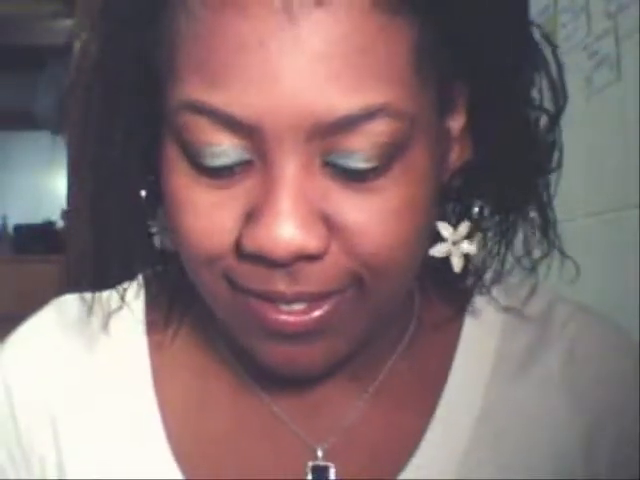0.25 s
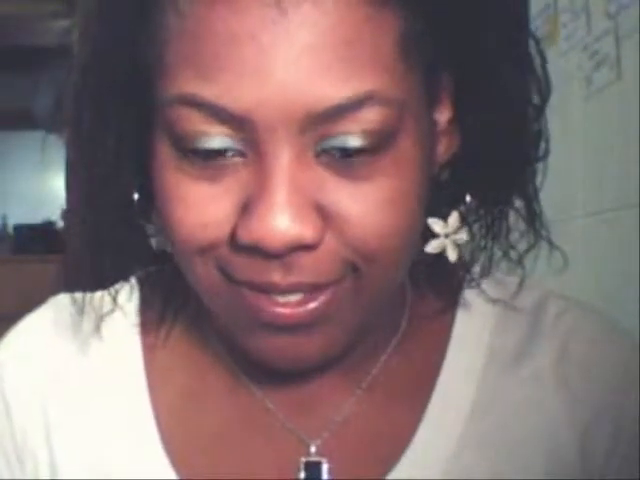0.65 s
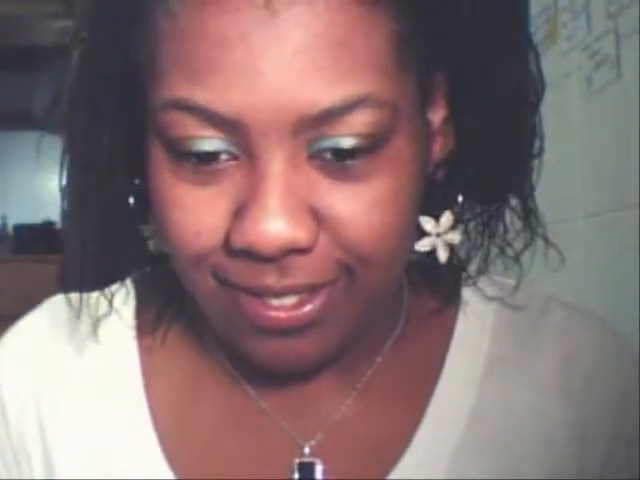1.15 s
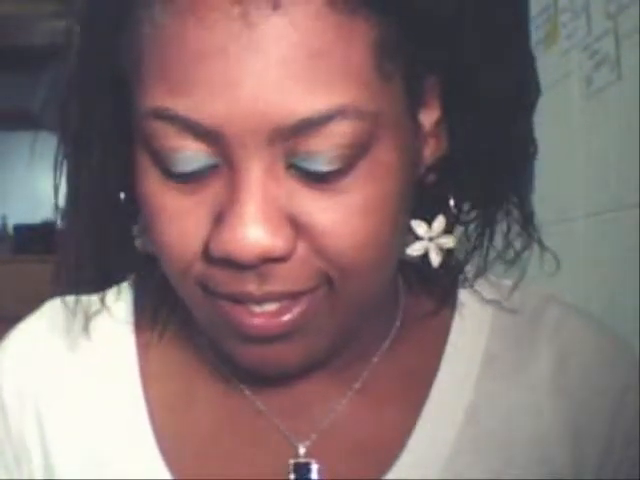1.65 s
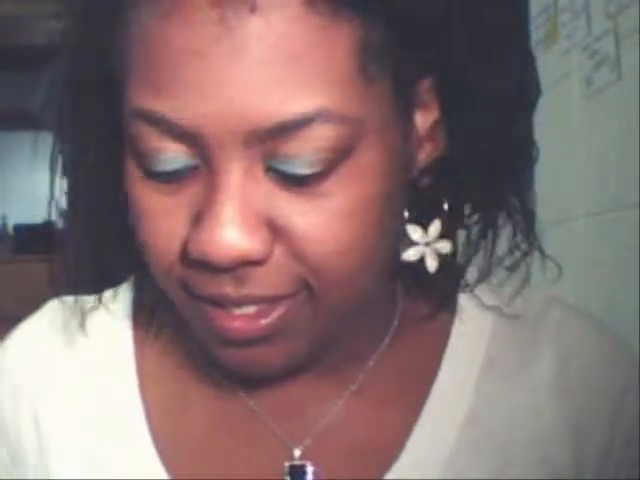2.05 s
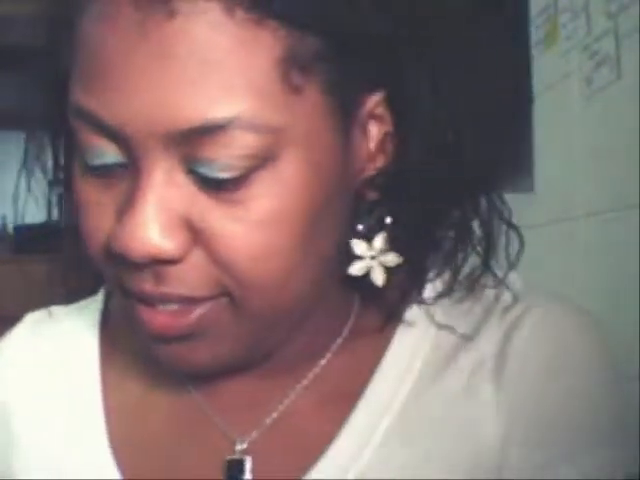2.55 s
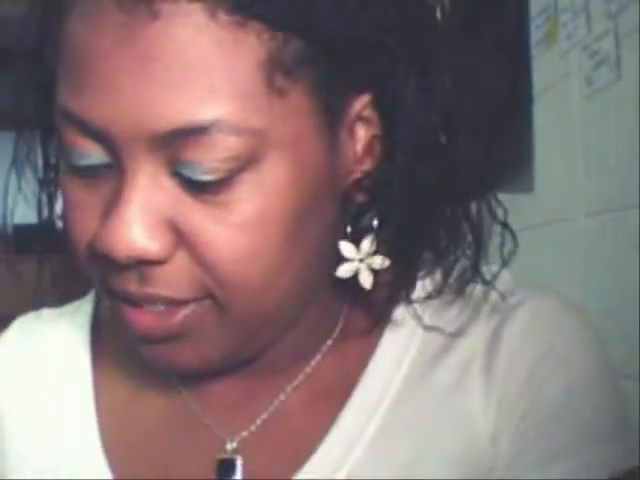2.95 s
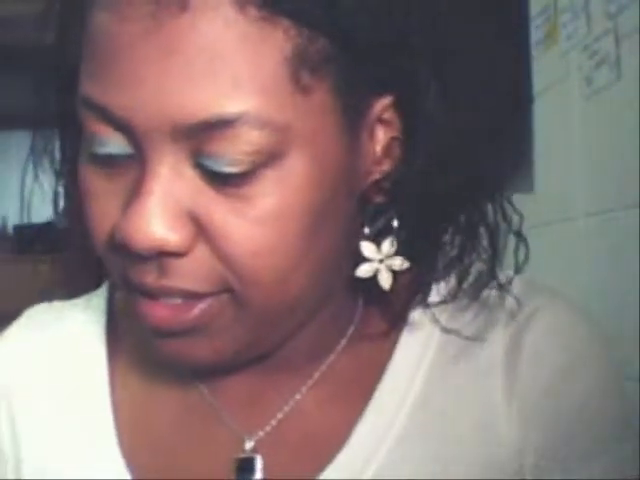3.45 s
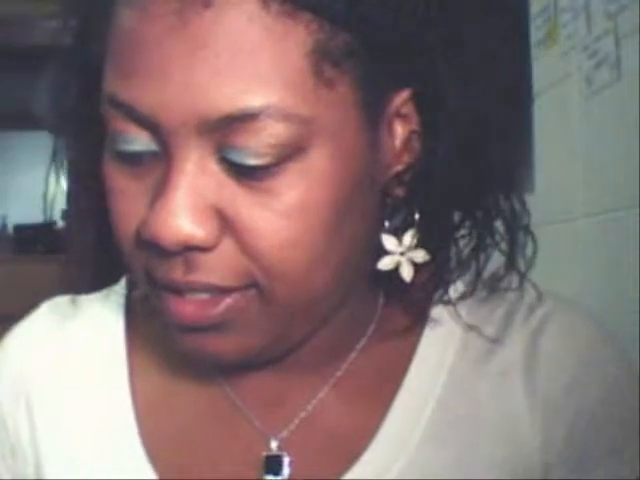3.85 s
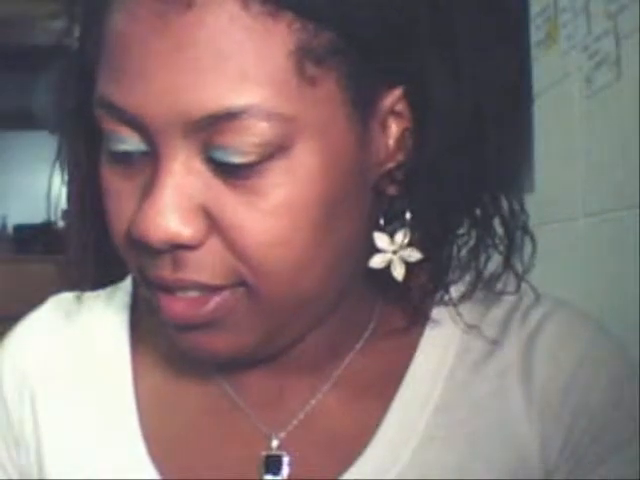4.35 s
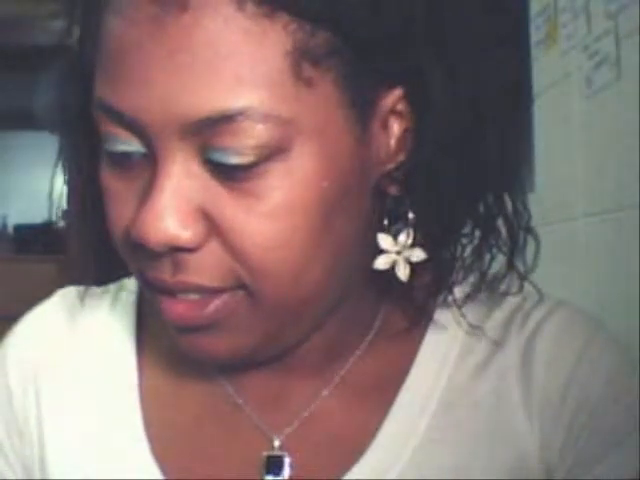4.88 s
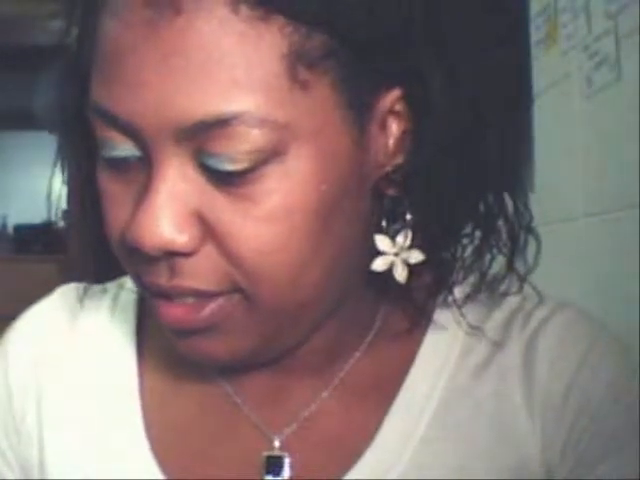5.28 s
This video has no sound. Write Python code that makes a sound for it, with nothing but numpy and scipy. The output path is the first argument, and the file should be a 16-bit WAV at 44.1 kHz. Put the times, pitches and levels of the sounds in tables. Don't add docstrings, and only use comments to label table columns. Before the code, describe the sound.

Handling of small hard plastic cases at a desk: one early click, a few faint ticks, a sharp knock with a low woody thump, a cluster of rubbing and tapping, then the loudest snap as a lid closes. Two isolated ticks come after. The band-limited microphone adds steady crackly hiss and stray electrical pops over a soft low fan hum.

```python
import sys
import numpy as np
from scipy import signal
from scipy.fft import rfft, irfft, next_fast_len
from scipy.io import wavfile

SR = 44100
rng = np.random.default_rng(int(sys.argv[2]) if len(sys.argv) > 2 else 0)


def level_to_linear(level):
    exponent = np.asarray(level, float) / 20
    return 10 ** exponent


def materialize(psi):
    bounded = np.clip(np.atleast_2d(psi).T, -1, 1)
    quanta = np.round(bounded * 32767).astype(np.int16)
    wavfile.write(sys.argv[1], SR, quanta)


N = 243476


def set_level(x, rms_db):
    return x * level_to_linear(rms_db) / np.sqrt(np.mean(x ** 2))


def resonate(x, modes):
    out = 0
    for k, (mode_hz, width_hz, gain_db) in enumerate(modes):
        b, a = signal.iirpeak(mode_hz, mode_hz / max(width_hz, 2), fs=SR)
        out = out + (-1) ** k * level_to_linear(gain_db) * signal.lfilter(b, a, x)
    return out


def add(track, start_s, sound, peak_db):
    i = int(start_s * SR)
    part = sound[:N - i]
    track[i:i + len(part)] += part * level_to_linear(peak_db) / np.max(np.abs(sound))


# pitch_hz [Hz], density_db [dB per Hz]
FAN_SPECTRUM = [(20, -41.5), (55, -2), (125, -6.5), (160, -14.5), (300, -19), (1110, -14), (1460, -21.5),
                (2860, -44)]
# pitch_hz [Hz], width_hz [Hz], level_db [dB rms]
FAN_HUMS = [(74.93, 4.7, -58), (115.8, 14, -60), (683, 10, -67), (1010, 10, -87)]


def fan():
    size = next_fast_len(N)
    hz = np.maximum(np.arange(size // 2 + 1) * SR / size, 1)
    point_hz, point_db = np.array(FAN_SPECTRUM).T
    colour = level_to_linear(np.interp(np.log(hz), np.log(point_hz), point_db, left=-80, right=-80))
    air = irfft(rfft(rng.standard_normal(size)) * colour, size)[:N]
    out = set_level(air, -51)
    for pitch_hz, width_hz, level_db in FAN_HUMS:
        mode = [(pitch_hz, width_hz, 0)]
        hum = resonate(resonate(rng.standard_normal(N), mode), mode)
        out = out + set_level(hum, level_db)
    return out


# start_s [s], level_db [dB peak]
SPIKES_UP = [(0.1839, -33.5), (0.2334, -33.3), (0.3651, -34.9), (0.4031, -34.6), (0.8105, -34.9),
             (2.311, -20.6), (2.3906, -36.5), (3.1279, -32.9), (3.2787, -26.0), (3.3168, -20.1),
             (3.3526, -33.8), (3.5631, -20.8), (3.8122, -35.2), (3.9815, -26.0), (4.0394, -35.6),
             (4.1321, -27.3), (4.1607, -31.8), (4.2226, -35.5), (4.3345, -34.2), (4.4271, -29.5)]
# start_s [s], level_db [dB peak]
SPIKES_DOWN = [
    (2.239, -25.9),
    (2.456, -26.5),
    (4.8266, -20.1),
]


def input_noise():
    sparks_per_s, spark_db, hiss_db = 4500, -51, -55.5
    sparks = (rng.random(N) < sparks_per_s / SR) * rng.exponential(size=N)
    out = set_level(sparks - sparks.mean(), spark_db)
    out += set_level(rng.standard_normal(N), hiss_db)
    for spikes, sign in ((SPIKES_UP, 1), (SPIKES_DOWN, -1)):
        for start_s, level_db in spikes:
            add(out, start_s, np.array([sign]), level_db + 11.2)
    return out


def pressure(strokes):
    t = np.arange(N) / SR
    out = np.zeros(N)
    for peak_s, level_db, press_s, release_s in strokes:
        corners_s = [peak_s - abs(press_s), peak_s, peak_s + abs(release_s)]
        out += np.interp(t, corners_s, [0, level_to_linear(level_db), 0])
    return out


# peak_s [s, most pressure], level_db [dB], press_s [s], release_s [s]
NAIL_STROKES = [
    (1.928, -52, 0.022, 0.075),
    (1.9615, -44, .0015, .006),
    (1.978, -42, 0.011, 0.013),
]
# peak_s [s, most pressure], level_db [dB], press_s [s], release_s [s]
FINGER_STROKES = [
    (2.668, -53, 0.015, 0.023),
    (2.722, -50.5, .02, 0.016),
    (2.86, -52, .12, 0.13),
    (2.945, -49, 0.031, .03),
    (2.978, -43, .018, 0.033),
    (3.015, -45.5, 0.038, 0.13),
]
# pitch_hz [Hz], width_hz [Hz], gain_db [dB]
CATCH_MODES = [(5600, 880, -2), (6500, 700, -6)]
# pitch_hz [Hz], width_hz [Hz], gain_db [dB]
WALL_MODES = [(3440, 880, -6), (4700, 450, 3), (5800, 5200, -5)]
# pitch_hz [Hz], width_hz [Hz], gain_db [dB]
HOLLOW_MODES = [(1050, 1020, 4.5), (1380, 145, 12.5)]


def slides():
    grains_per_s = 3000
    grains = (rng.random(N) < grains_per_s / SR) * rng.standard_normal(N)
    grains = grains * level_to_linear(1.5 * rng.exponential(size=N))
    catch = set_level(resonate(grains, CATCH_MODES), -3)
    walls = set_level(resonate(grains, WALL_MODES), -4.5)
    hollow = set_level(resonate(grains, HOLLOW_MODES), -3.5)
    return catch * pressure(NAIL_STROKES) + (walls + hollow) * pressure(FINGER_STROKES)


# start_s [s, the knock], level_db [dB peak], pitch_hz [Hz]
THUDS = [(1.984, -34.5, 477), (1.984, -28.5, 380), (1.984, -35.5, 285), (1.985, -39.5, 220),
         (1.983, -39, 127.5), (2.467, -34, 1380), (2.466, -41, 131), (2.465, -46, 230), (2.466, -43.5, 466),
         (2.666, -41.5, 257), (2.889, -44.5, 490), (3.489, -37.5, 342)]


def thuds():
    out = np.zeros(N)
    t = np.arange(8192) / SR
    for start_s, level_db, pitch_hz in THUDS:
        t60_s = 0.03 + 0.072 * (230 / pitch_hz) ** 2.6
        shake = resonate(rng.standard_normal(len(t)), [(pitch_hz, 0.35 * pitch_hz, 0)])
        tone = np.sin(2 * np.pi * pitch_hz * t) + set_level(shake, -9)
        ring = tone * np.exp(-np.log(1000) * t / max(t60_s, 0.002))
        lag_s = 0.45 / pitch_hz
        add(out, start_s + lag_s, ring, level_db)
    return out


def chatter(contact_ms, size=4096):
    happens = rng.random(size) < 0.15
    force = 2 * rng.random(size) - 1
    out = happens * force * np.exp(-1000 * np.arange(size) / SR / contact_ms)
    out[0] = 1.44
    return out


# [dB, hollow minus bright]
TICKS = [(0.558, -38.5, 4500, -16), (1.261, -44, 4600, -15), (1.4526, -57, 3260, -3),
         (1.611, -45, 3320, -9), (2.6416, -47, 4100, -18), (2.661, -38, 4570, 7), (2.6702, -40, 3050, 14),
         (2.71, -48, 3100, -8), (2.824, -42, 4930, 14), (2.8607, -45, 4600, 13), (2.9612, -31.5, 3860, 4),
         (2.9761, -31, 4800, 4.5), (3.0072, -36, 3760, -8), (3.0117, -32.5, 4800, 3),
         (3.063, -50, 3840, -6), (3.2118, -33.5, 3670, -1), (3.337, -44.5, 5600, 4),
         (4.488, -38.5, 4470, -9), (5.3648, -40.5, 2920, -10)]


def ticks():
    out = np.zeros(N)
    for start_s, level_db, pitch_hz, hollow_db in TICKS:
        modes = [(pitch_hz, 300, 2),
                 (min(1.364 * pitch_hz, 6800), 600, -7),
                 (0.72 * pitch_hz, 700, -10),
                 (1143, 220, hollow_db - 0.5)]
        add(out, start_s, resonate(chatter(contact_ms=1.9), modes), level_db + 5)
    return out


# pitch_hz [Hz], width_hz [Hz], gain_db [dB]
CLASP_MODES = [(450, 570, -8.5), (2080, 500, -11.5), (3670, 480, -1), (4400, 310, 0), (4800, 380, -4),
               (6440, 560, -1.5)]
CASE_MODES = [(396, 76, 4), (1600, 640, -4.5), (2300, 220, -3), (3690, 730, 0.5), (4570, 53, 12),
              (5340, 270, 4), (6880, 780, 2.5)]
BASE_MODES = [(640, 170, -9.5), (1424, 130, -2), (2300, 130, -13), (2900, 790, -8.5), (3780, 480, -12),
              (5200, 760, -10), (5560, 700, -13.5)]
LID_MODES = [(600, 210, -2), (1050, 710, 4), (1460, 670, 2.5), (2080, 410, 2), (3140, 460, -5.5),
             (3730, 300, 1), (4500, 650, -5), (5750, 270, -3), (6710, 830, -8)]
# start_s [s], level_db [dB peak]
CLASP_HITS = [
    (.2135, -17.5),
    (.2190, -34),
]
CASE_HITS = [
    (1.9850, -11.5),
    (1.9858, -27),
    (1.9868, -24),
]
BASE_HITS = [
    (3.4364, -25),
    (3.4378, -22),
]
LID_HITS = [
    (3.4902, -4.5),
    (3.4908, -9),
    (3.4913, -11),
    (3.4922, -7),
]
CRACK_DB = [
    -31,
    -15.5,
    -15,
    -9.5,
]


def blows():
    out = np.zeros(N)
    contact = signal.unit_impulse(4096)
    crack = signal.lfilter(*signal.butter(1, [900, 5000], "band", fs=SR), contact)
    parts = ((CLASP_HITS, CLASP_MODES), (CASE_HITS, CASE_MODES), (BASE_HITS, BASE_MODES), (LID_HITS, LID_MODES))
    for (hits, modes), crack_db in zip(parts, CRACK_DB):
        blow = resonate(contact, modes) + level_to_linear(crack_db) * crack
        for start_s, level_db in hits:
            add(out, start_s, blow, level_db)
    return out


def echoes(t60_s, delay_s, level_db, band_hz):
    t = np.arange(12000) / SR
    noise = signal.lfilter(*signal.butter(1, band_hz, "band", fs=SR), rng.standard_normal(len(t)))
    onset = np.clip(t / delay_s, 0, 1) ** 4
    decay = np.exp(-np.log(1000) * t / t60_s)
    return set_level(noise * decay * onset, level_db) / np.sqrt(len(t))


def room(x):
    desk = echoes(t60_s=0.024, delay_s=0.0017, level_db=-13, band_hz=[700, 5000])
    walls = echoes(t60_s=0.17, delay_s=0.0062, level_db=-15.5, band_hz=[1200, 5500])
    return x + signal.fftconvolve(x, desk + walls)[:N]


def scene():
    handling = slides() + thuds() + ticks() + blows()
    return (fan() + input_noise() + room(handling))[None]


def band_limit(x):
    return signal.sosfilt(signal.butter(12, 7280, fs=SR, output="sos"), x)


def record(dry):
    taps = signal.firwin(121, 6606, window=("kaiser", 7.5), fs=SR)
    mix = signal.fftconvolve(dry, taps[None], mode="same")
    mix = mix + level_to_linear(-101) * rng.standard_normal(dry.shape)
    return band_limit(mix)


dry = scene()
out = record(dry)
materialize(out)
```